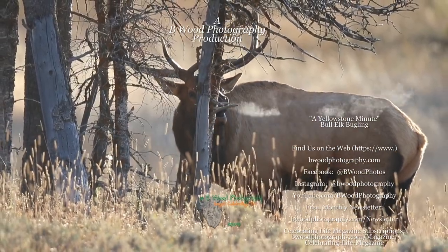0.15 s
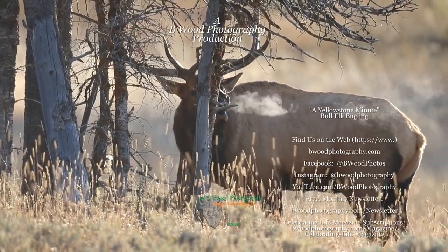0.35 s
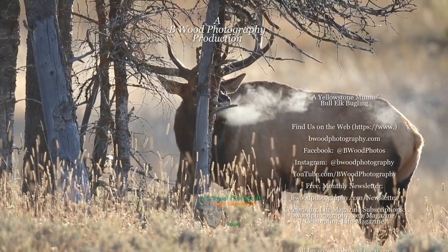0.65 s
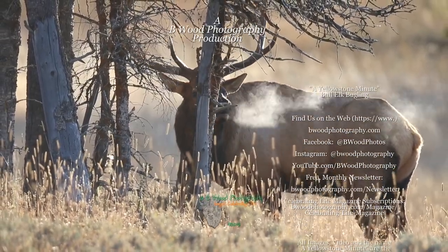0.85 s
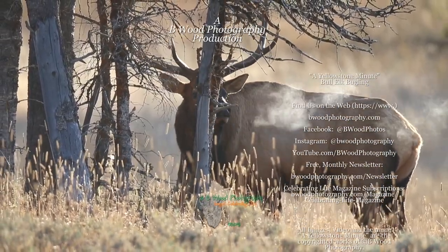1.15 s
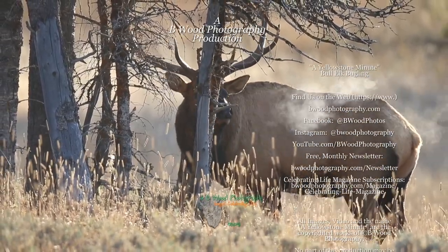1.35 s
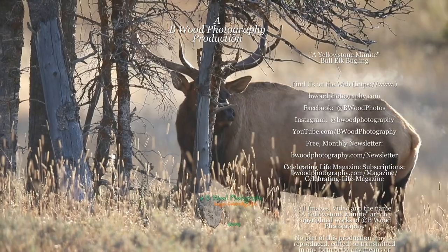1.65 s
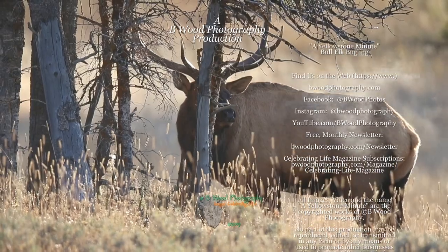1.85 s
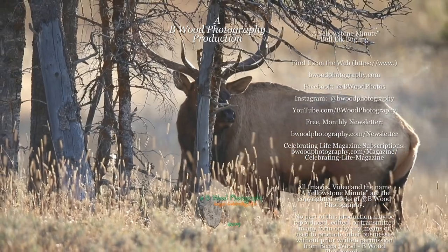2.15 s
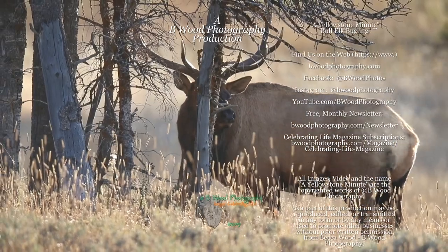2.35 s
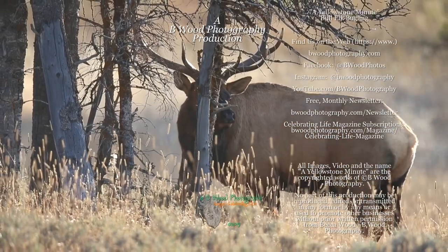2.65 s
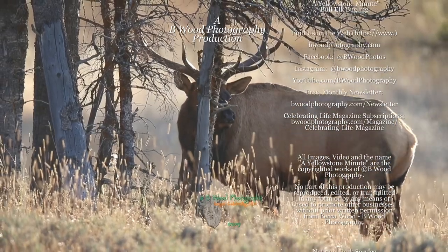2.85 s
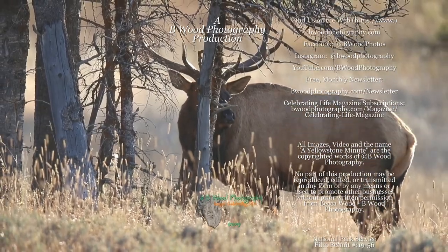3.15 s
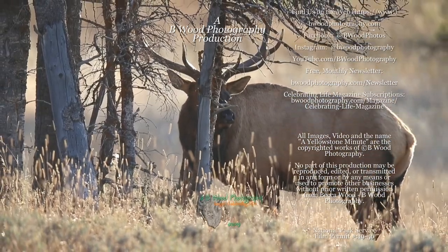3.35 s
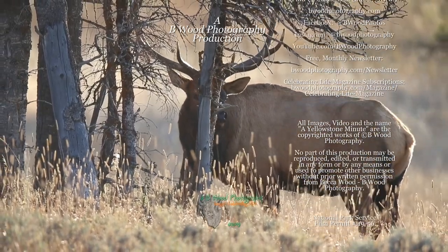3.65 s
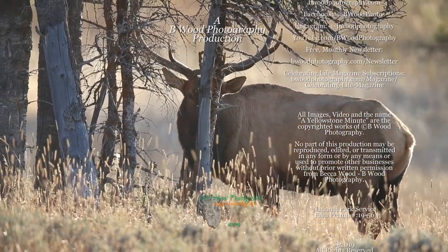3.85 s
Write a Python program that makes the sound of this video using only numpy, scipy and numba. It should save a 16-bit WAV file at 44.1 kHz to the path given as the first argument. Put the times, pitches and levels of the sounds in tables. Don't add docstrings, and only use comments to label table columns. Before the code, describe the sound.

Tail of an elk bugle tumbling down in pitch, then quiet woodland wind with faint ticks.

```python
import sys
import numpy as np
from scipy import signal
from scipy.fft import rfft, irfft
from scipy.io import wavfile
from scipy.ndimage import uniform_filter1d
from numba import njit

SR = 44100
rng = np.random.default_rng(int(sys.argv[2]) if len(sys.argv) > 2 else 0)


def materialize(psi):
    bounded = np.clip(np.atleast_2d(psi).T, -1, 1)
    quanta = np.round(bounded * 32767).astype(np.int16)
    wavfile.write(sys.argv[1], SR, quanta)


def magnitude_from_level(level_db):
    exponent = np.asarray(level_db, float) / 20
    return 10 ** exponent


N = 176400
T = np.arange(N) / SR


@njit
def svf(x, hz, width):
    y, band, low = np.empty(len(x)), 0., 0.
    g, damping = np.tan(np.pi * hz / SR), width / hz
    for i in range(len(x)):
        v = (band + g * (x[i] - low)) / (1 + g * (g + damping))
        band, low = 2 * v - band, low + 2 * g * v
        y[i] = damping * v
    return y


def unit(x):
    return x / np.sqrt(np.mean(x ** 2))


def walk(rate_hz):
    hold = max(int(SR / rate_hz), 40)
    held = rng.standard_normal(5000)[np.arange(N) // hold]
    return unit(uniform_filter1d(uniform_filter1d(held, hold), hold))


def rough(share):
    share = np.clip(share, 0, 1)
    return np.sqrt(1 - share ** 2) + share * walk(500)


def fade_after(end_s, release_s):
    return np.exp(-np.maximum(T - end_s, 0) / release_s)


def gate(start_s, length_s, attack_s, release_s):
    return np.clip((T - start_s) / attack_s, 0, 1) * fade_after(start_s + length_s, release_s)


def turns(hz):
    return 2 * np.pi * np.cumsum(hz) / SR


def line(rows, release_s):
    s, hz, db = np.array(rows).T
    already_on = s[0] < .05
    edge = np.clip((T - s[0]) / 0.09 + already_on, 0, 1) * fade_after(s[-1], release_s)
    pitch = np.interp(T, s, hz) * (1 + 0.0015 * walk(60))
    return 2 ** .5 * edge * magnitude_from_level(np.interp(T, s, db)), np.pi / 2 + turns(pitch)


def wind():
    # pitch_hz, level_db (per Hz)
    colour = [(22, -8), (60, -1.5), (300, -1.5), (850, -3), (1300, -8.5), (2200, -20), (3500, -26.5),
              (15500, -32)]
    swell_db, flicker_db = .5, 0.91
    log_f = np.log(np.maximum(np.fft.rfftfreq(N, 1 / SR), 5))
    hz, db = np.array(colour).T
    bass_cut_db = 14 * np.maximum(np.log(hz[0]) - log_f, 0)
    spectrum = rfft(rng.standard_normal(N)) * magnitude_from_level(np.interp(log_f, np.log(hz), db) - bass_cut_db)
    centres = np.log(np.r_[1, 60 * 2. ** np.arange(9)])
    swell = walk(0.52)
    out = 0
    for share in np.eye(len(centres)):
        band = irfft(spectrum * np.interp(log_f, centres, share), N)
        out = out + band * magnitude_from_level(swell_db * swell + flicker_db * walk(10))
    return unit(out) * magnitude_from_level(-58)


def whistles():
    # time_s, pitch_hz, level_db
    held_curve = [(0.0, 2108, -38.5), (0.018, 2108, -40), (0.282, 2102, -43), (0.388, 2034, -41)]
    # time_s, pitch_hz, level_db
    glide_curve = [(.29, 2820, -53), (.33, 2665, -46.5), (.376, 2555, -35), (.395, 2500, -42.5),
                   (.425, 2440, -41), (.49, 2200, -40), (.52, 2090, -52), (.575, 1933, -41),
                   (.65, 1770, -48.5)]
    # time_s, roughness (0-1)
    smear = [
        (.385, .08),
        (.44, .7),
        (.53, .65),
        (.56, .3),
        (.65, .4),
    ]
    held, p = line(held_curve, 0.0055)
    clean, q = line(glide_curve, 0.0062)
    glide = clean * rough(np.interp(T, *np.array(smear).T)) * magnitude_from_level(walk(45))

    out = held * (np.sin(p) + magnitude_from_level(-25.5) * np.sin(2 * p) + magnitude_from_level(-36) * np.sin(3 * p) * (T < .31))
    octave = magnitude_from_level(-49) * np.sqrt(clean) * fade_after(.4, .12) * np.sin(2 * q)
    out = out + glide * np.sin(q) + octave * rough(0.92)
    out = out + magnitude_from_level(-30) * np.sqrt(held * clean) * (T > .29) * np.sin(p + q)
    return out + magnitude_from_level(26) * held * glide * glide * np.sin(p + 2 * q)


def breath():
    # pitch_hz, width_hz, level_db
    narrow = [(700, 51, -8.5), (998, 24, 2.5), (1429, 62, -4.5), (1900, 35, -4.5), (2410, 180, 3.5),
              (2550, 80, -6), (2820, 69, -9), (3150, 74, -12.5), (5240, 1200, -17)]
    # pitch_hz, width_hz, level_db
    wide_open = [(524, 81, -12.5), (671, 50, -8), (960, 35, 1.5), (1225, 40, -14), (1474, 100, -3.5),
                 (1860, 110, 0.5), (2193, 63, -8), (2413, 78, -13), (2784, 44, -16), (3084, 56, -21),
                 (4110, 230, -25), (5500, 2400, -27)]
    # pitch_hz, width_hz, level_db
    squeal = [(1837, 64, -3), (2030, 130, -2), (2196, 120, -1), (2442, 64, 1.5), (2543, 54, -8),
              (4180, 240, -24.5), (4800, 180, -28)]
    # time_s, narrow_db, open_db, squeal_db
    course = [
        (0, -51.5, -65, -82),
        (.33, -51, -75, -69),
        (.385, -61, -71, -53),
        (.4, -69, -70, -44.5),
        (.445, -67, -54, -42.5),
        (0.479, -64, -44, -43),
        (.54, -64, -45.5, -51.5),
        (.6, -56, -48.5, -56.5),
        (.72, -61, -40.5, -57),
        (0.754, -74, -51.5, -63),
    ]
    s, *levels = np.array(course).T
    out = 0
    for throat, db in zip((narrow, wide_open, squeal), levels):
        air = rng.standard_normal(N) * magnitude_from_level(2.5 * walk(79.73))
        body = 0
        for hz, width, peak_db in throat:
            once = svf(air, float(hz), 1.19 * width)
            body = body + magnitude_from_level(peak_db) * unit(svf(once, float(hz), 2.06 * width))
        out = out + unit(body) * magnitude_from_level(np.interp(T, s, db)) * fade_after(s[-1], 0.0065)
    return signal.sosfilt(signal.butter(4, 8000, fs=SR, output="sos"), out)


def falling_steps():
    # start_s, length_s, start_hz, end_hz, level_db
    steps = [(.21, 0.1, 2845, 2825, -59), (0.381, 0.018, 2035, 2030, -39.5),
             (0.408, 0.12, 1860, 1755, -44.5), (0.465, 0.026, 960, 951, -47.5),
             (0.488, .05, 709.6, 682, -50.5), (0.571, 0.032, 1440, 1431, -47.5),
             (0.6, 0.071, 1235, 1220, -44.5), (0.63, 0.043, 2444, 2438, -45.5),
             (0.676, 0.0425, 1010, 911, -36.5), (0.684, 0.043, 1907, 1837, -42),
             (0.681, 0.05, 1491, 1450, -50.5), (0.722, 0.013, 690, 658, -39),
             (0.739, 0.017, 1801, 1860, -54.5), (0.741, 0.017, 1045, 1002, -43.5)]
    out = 0
    for s, length, hz0, hz1, db in steps:
        pitch = np.interp(T, [s, s + length], [hz0, hz1]) * (1 + .004 * walk(89.1))
        level = magnitude_from_level(db + 1.2 * walk(60)) * gate(s, length, 0.013, 0.0093)
        out = out + 2 ** .5 * level * rough(.18) * np.sin(turns(pitch))
    return out


def chest_tone():
    # time_s, pitch_hz, level_db
    curve = [
        (.47, 370, -52),
        (.53, 337.4, -59),
        (.65, 329.4, -69),
        (.72, 297.6, -66.5),
        (.775, 307, -60),
    ]
    level, phase = line(curve, 0.009)
    return level * rough(.4) * (np.sin(phase) + magnitude_from_level(3) * np.sin(2 * phase) * (T < .73))


def side_branch(call):
    return call - 0.95 * svf(call, 1670., 92.)


def echoes(call):
    t, tail = T[:2 * SR], 0
    for db, t60_s, rise_s in ((-24, .3, .03), (-33.5, 2.14, .15)):
        scatter = svf(rng.standard_normal(len(t)), 1700., 2300.)
        tail = tail + magnitude_from_level(db) * unit(scatter * 1000 ** (-t / t60_s) * np.clip(t / rise_s, 0, 1))
    return signal.fftconvolve(call, tail / np.sqrt(len(t)))[:N]


def grass_ticks():
    # start_s, peak_db, centre_hz
    ticks = [(0.5194, -56.5, 3060), (0.6094, -57, 3010), (0.6934, -58, 3250), (0.7144, -69, 3210),
             (0.853, -64, 4700), (0.9386, -63, 3790), (1.1199, -63.5, 4010), (1.4687, -65, 3220),
             (1.5394, -63.5, 3400), (2.331, -65, 4080), (2.4194, -68, 4500), (2.6594, -64, 3090),
             (2.7412, -65, 4040), (2.9194, -63.5, 3980), (3.1994, -67, 3050), (3.3513, -61, 3950),
             (3.538, -62, 4050), (3.6194, -69, 4890)]
    noise, out = rng.standard_normal(N), 0
    for s, db, hz in ticks:
        out = out + magnitude_from_level(db - 7) * gate(s, 0.00085, 0.00059, 0.0084) * unit(svf(noise, float(hz), 0.58 * hz))
    return out


def far_bird():
    # start_s, length_s, pitch_hz, level_db
    song = [
        (3.342, .045, 3970, -82),
        (3.4, 0.038, 3980, -78),
        (3.48, .03, 2700, -80),
        (3.628, 0.037, 2870, -84),
    ]
    out = 0
    for s, length, hz, db in song:
        out = out + magnitude_from_level(db) * gate(s, length, .01, .006) * np.sin(2 * np.pi * hz * T)
    return out


def scene():
    air = wind()
    call = side_branch(whistles() + breath() + falling_steps() + chest_tone())
    return (air + call + echoes(call) + grass_ticks() + far_bird())[None]


def top_cut(x):
    return signal.sosfilt(signal.butter(12, 15800, fs=SR, output="sos"), x)


def record(dry):
    return top_cut(dry)


dry = scene()
out = record(dry)
materialize(out)
```